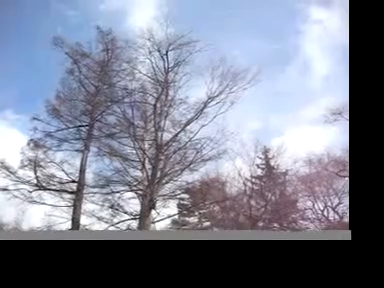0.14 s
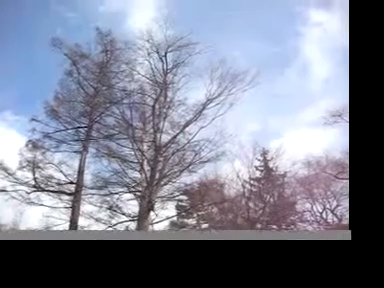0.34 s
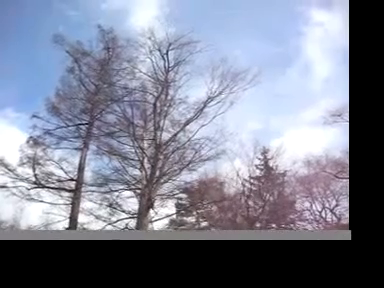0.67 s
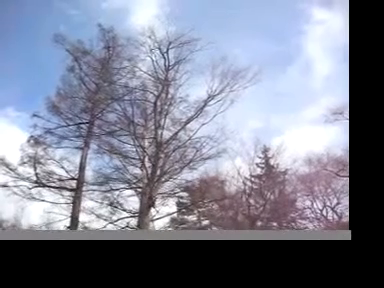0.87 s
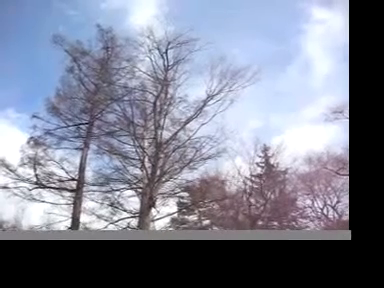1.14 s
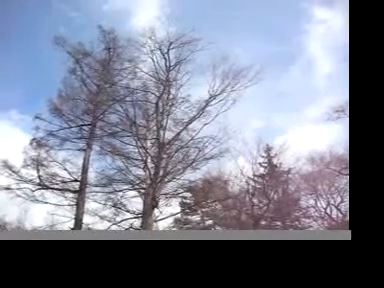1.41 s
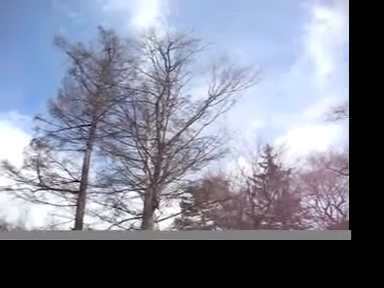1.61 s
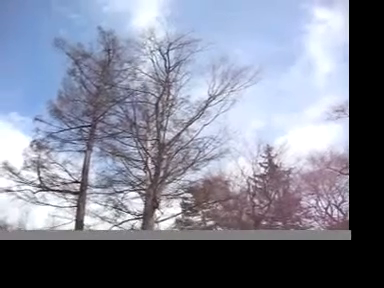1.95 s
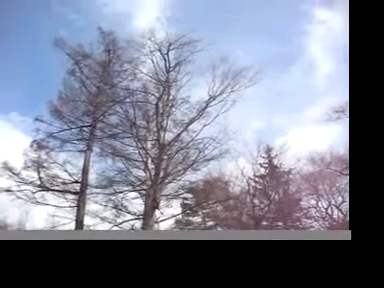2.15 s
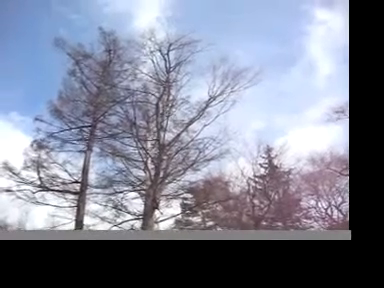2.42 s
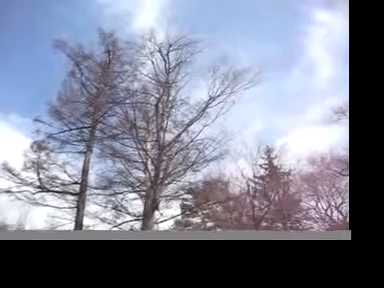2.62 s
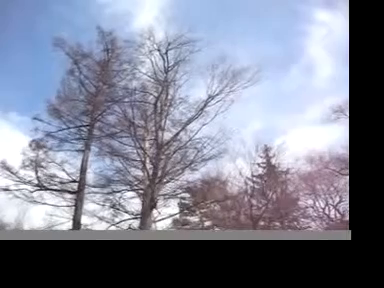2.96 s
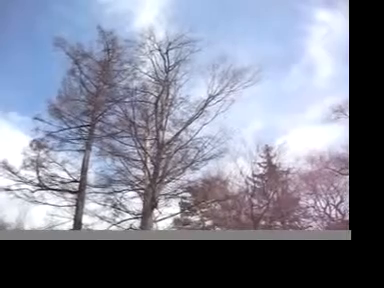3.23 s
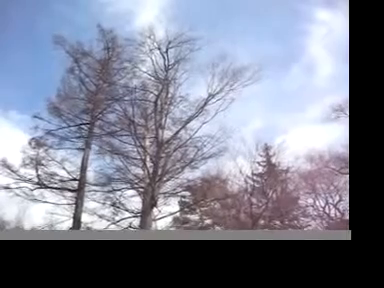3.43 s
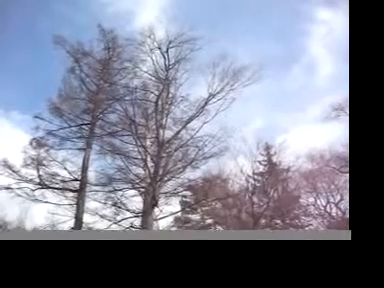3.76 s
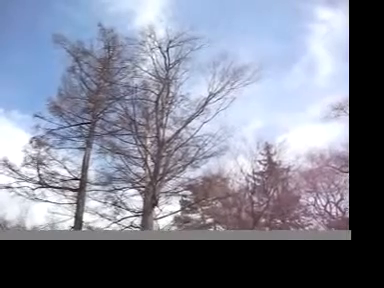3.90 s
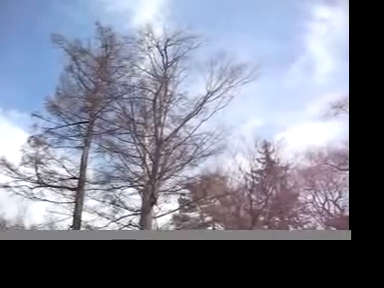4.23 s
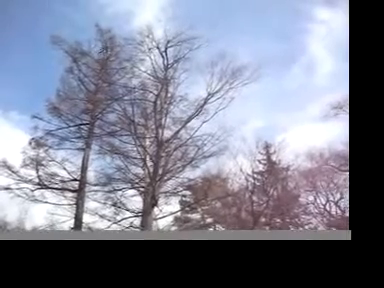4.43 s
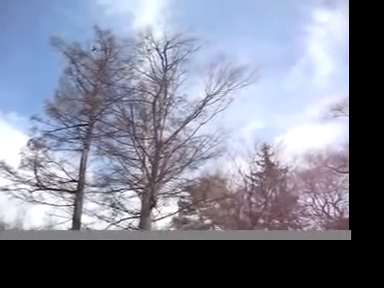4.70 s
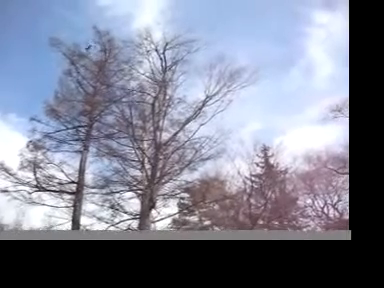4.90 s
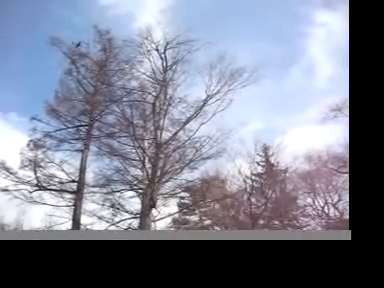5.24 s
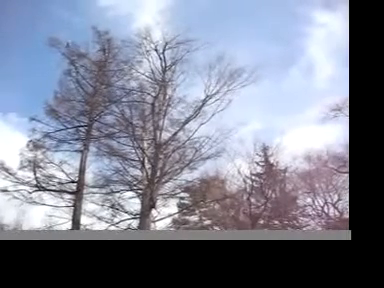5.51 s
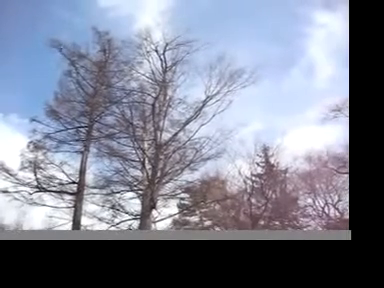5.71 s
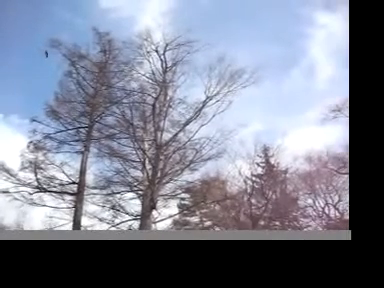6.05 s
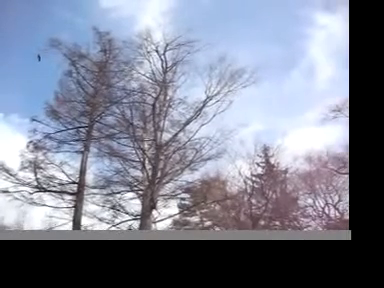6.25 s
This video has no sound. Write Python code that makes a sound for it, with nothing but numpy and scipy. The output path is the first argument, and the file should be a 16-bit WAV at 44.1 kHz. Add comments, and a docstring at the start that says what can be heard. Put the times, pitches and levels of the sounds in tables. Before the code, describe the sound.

Thin small-bird chirps over soft distant rumble, then a bird of prey's piercing slurred whistle breaks into a quickening trill amid wind bumps.

```python
"""Kite whistling in a park

A kite whistles from a tall tree: a rising slur, a high note, lower notes, then a long wavering trill,
all sine whistles with overtones and rasp. Small birds add gliding sines and short chips in a haze of high noise.
Behind them lie coloured noise for distant traffic and wind, a low drone, and gusts thumping the microphone.
The small camera samples slowly, whines faintly, and its hiss swells with the treble."""
import sys
import numpy as np
from scipy import signal
from scipy.io import wavfile
from scipy.ndimage import uniform_filter1d

SR = 44100
rng = np.random.default_rng(int(sys.argv[2]) if len(sys.argv) > 2 else 0)


def output_pcm(signal):
    """Save a mono or channel-first signal as 16-bit PCM at the path in sys.argv[1].

    Samples are clipped to [-1, 1] before scaling.
    """
    pcm = np.clip(np.atleast_2d(signal).T, -1, 1) * 32767
    wavfile.write(sys.argv[1], SR, np.round(pcm).astype(np.int16))


N = 280784


def gain_of(db):
    """Turn decibels into an amplitude factor."""
    return 10 ** (np.asarray(db) / 20)


def evened(x):
    """Scale a signal to rms 1."""
    return x / np.sqrt(np.mean(x ** 2) + 1e-20)


def follow(rows):
    """Draw a gain curve at every sample from (time [s], level [dB]) points."""
    s, db = np.transpose(rows)
    return gain_of(np.interp(np.arange(N) / SR, s, db))


def add(mix, s, sound):
    """Lay a sound into the mix from time s, cut off at the end of the mix."""
    part = mix[round(s * SR):][:len(sound)]
    part += sound[:len(part)]


def drift(samples, count):
    """Smooth random wandering of rms 1: white noise averaged twice over the given span of samples."""
    span = max(int(samples), 2)
    once = uniform_filter1d(rng.standard_normal(count), span)
    return evened(uniform_filter1d(once, span))


def noise(points, patchy_db, size):
    """Noise of rms 1 from random short-time spectra: a set colour with drifting louder and softer patches."""
    hz = np.fft.rfftfreq(size, 1 / SR)
    real, imag, patches = rng.standard_normal((4 * N // size + 5, len(hz), 3)).T
    patches = uniform_filter1d(patches, 12, 0)  # smooth across pitch
    patches = evened(uniform_filter1d(patches, 10, 1))  # smooth across time
    f, db = np.transpose(points)
    colour_db = np.interp(np.log(hz + 1), np.log(f), db, -90, -90)
    spectra = (real + 1j * imag) * gain_of(colour_db[:, None] + patchy_db * patches)
    sound = signal.istft(spectra, nperseg=size, noverlap=3 * size // 4)[1]
    return evened(sound[:N])


def park(x, t60, gap_s):
    """Echoes off trunks and ground: after a gap, sparse taps of random sign that die away by 60 dB in t60."""
    at = np.arange(0, SR - 20, 20)
    at = at + rng.integers(0, 20, len(at))
    taps = np.zeros(SR)
    taps[at] = rng.choice([-1., 1.], len(at)) * gain_of(-60 * at / SR / t60)
    taps = np.r_[np.zeros(int(gap_s * SR)), taps / np.linalg.norm(taps)]
    return signal.fftconvolve(x, taps)[:N]


# Colour of traffic and leaves: (frequency [Hz], relative density [dB per Hz])
WASH_COLOUR = [(60, -7.5), (110, -5), (250, -10), (365, -15), (600, -15), (1000, -16.5), (1500, -23.5),
               (2200, -27), (3200, -27), (4600, -29.5), (6000, -27), (8000, -57)]
# Loudness of the wash: (time [s], level [dB])
WASH_LEVEL = [(0.0, -42), (0.87, -39), (2.12, -38.5), (2.71, -37.5), (3.12, -39), (4.5, -39.5), (5.0, -39),
              (6.36, -39)]


def wash():
    """Distant traffic and wind in the branches: broad coloured noise on a slow level curve."""
    return follow(WASH_LEVEL) * noise(WASH_COLOUR, patchy_db=0.54, size=1024)


# Low drone, maybe a far engine, before its wavering:
# (time [s], pitch [Hz], fundamental level [dB], octave level [dB])
DRONE_COURSE = [(0, 68.4, -57, -51.5), (2.0, 67.1, -50, -52), (2.9, 66.2, -46, -44), (3.2, 66.95, -47, -59),
                (3.8, 68.3, -48, -55), (4.05, 68.2, -38.5, -50), (4.5, 70.5, -49, -58),
                (5.5, 69.64, -45.5, -59), (6.36, 71, -49, -53)]


def drone():
    """A low tone and its octave, locked in phase, wavering in pitch and each in level."""
    s, *columns = np.transpose(DRONE_COURSE)
    hz, low_db, octave_db = (np.interp(np.arange(N) / SR, s, c) for c in columns)
    phase = 2 * np.pi * np.cumsum(hz + 1.477 * drift(2760, N)) / SR
    low = gain_of(low_db + 1.6 * drift(3000, N)) * np.sin(phase)
    octave = gain_of(octave_db + 2.5 * drift(3000, N)) * np.sin(2 * phase)
    return np.sqrt(2) * (low + octave)


# Whining tones: (frequency from frame to frame [Hz], lowering within a frame [Hz], relative level [dB])
WHINE_TONES = [(2774, 9.5, 0), (3176, 15, -13)]
# Loudness of the whine between its dips: (time [s], level [dB])
WHINE_LEVEL = [(0, -55), (.6, -53), (1.2, -51.5), (4, -51), (6.36, -50.5)]
FRAMES_PER_S = 30


def whine():
    """Thin tones from the camera's electronics that dip and jump in phase with every picture frame."""
    t = np.arange(N) / SR
    frame_s = 1 / FRAMES_PER_S
    since = (t + .0064) % frame_s
    from_edge = np.minimum(since, frame_s - since)
    dips = 1 - .7 * np.exp(-(from_edge / .001) ** 2)
    tones = np.zeros(N)
    for hz, lower_hz, db in WHINE_TONES:
        tones += gain_of(db) * np.sin(2 * np.pi * (hz * t - lower_hz * since))
    return np.sqrt(2) * follow(WHINE_LEVEL) * dips * tones


# Colour of the wind rumble: (frequency [Hz], relative density [dB per Hz])
RUMBLE_COLOUR = [(15, -28), (40, 1.5), (68, 4), (100, -2), (140, -10.5), (200, -17.5), (300, -26.5),
                 (450, -33)]
# Loudness of the rumble at the microphone: (time [s], level [dB])
WIND_LEVEL = [(0.0, -46), (0.32, -39.5), (0.46, -30.5), (0.87, -38), (1.65, -34.5), (2.02, -44.5),
              (2.34, -42.5), (2.92, -32), (3.19, -37.5), (3.43, -29.5), (3.58, -31.5), (3.67, -48),
              (3.95, -40), (4.94, -41), (5.9, -45), (6.36, -40)]


def rumble():
    """Lumpy low noise of eddies at the microphone."""
    lumps = gain_of(2.6 * drift(500, N))
    return follow(WIND_LEVEL) * evened(lumps * noise(RUMBLE_COLOUR, patchy_db=1.0, size=2048))


# Gust thumps: (centre time [s], peak level of the fundamental [dB], frequency [Hz])
THUMPS = [(0.343, -22.5, 89), (0.389, -19, 97), (0.41, -24, 69.5), (0.529, -20, 174), (0.539, -12, 103),
          (0.57, -20, 102), (0.817, -24, 92), (1.156, -25.5, 82), (1.238, -23.5, 89.5), (1.291, -16.5, 78),
          (1.311, -23, 111), (2.82, -19.5, 92), (2.863, -22, 161), (2.927, -19, 73.9), (3.042, -20.5, 83),
          (3.136, -24.5, 97), (3.28, -16.5, 124.8), (3.302, -22, 110.3), (3.325, -15.5, 117.4),
          (3.336, -19, 214), (3.358, -24, 69), (3.387, -15.5, 106), (3.397, -18, 174), (3.424, -22.5, 68.4),
          (3.492, -16, 80.5), (3.517, -18.5, 97), (3.582, -18.5, 103), (4.289, -24, 74.4)]
# Half width of a 100 Hz thump [s]; higher ones are shorter by this power of pitch
THUMP_HALF_S, THUMP_SHORTER = .0062, 0.53


def thumps():
    """Single gusts at the microphone: a brief low swing with a weaker octave under a bell-shaped envelope."""
    out = np.zeros(N)
    for s, db, hz in THUMPS:
        half_s = THUMP_HALF_S / (hz / 100) ** THUMP_SHORTER
        t = np.arange(-4 * half_s, 4 * half_s, 1 / SR)
        swing = 2 * np.pi * (hz * t + rng.random())
        shape = np.cos(swing) + 0.24 * np.cos(2 * swing + 1)  # a pointed, lopsided pressure swing
        add(out, s + t[0], gain_of(db) * shape * np.exp(-(t / half_s) ** 2))
    return out


# Colour of the echo haze around the chirps: (frequency [Hz], relative density [dB per Hz])
HAZE_COLOUR = [(3600, -17), (4200, -2.5), (4800, -2), (5300, -4), (6200, -12)]
# Swells of the haze: (centre time [s], half width [s], level at the centre [dB])
HAZE_SWELLS = [(.8, 0.18, -51), (1.42, 0.2, -50), (4.62, .12, -55), (4.9, 0.12, -50.5), (5.6, 0.18, -61)]


def haze():
    """Echo haze around the chirps: patchy high noise that swells and fades."""
    t = np.arange(N) / SR
    level = np.zeros(N)
    for s, width_s, db in HAZE_SWELLS:
        level += gain_of(db) * np.exp(-((t - s) / width_s) ** 2)
    return level * noise(HAZE_COLOUR, patchy_db=2.0, size=512)


# Short dry chips of a small bird: (centre time [s], frequency at the centre [Hz], peak level [dB])
CHIPS = [(3.64, 4000, -42), (3.669, 5200, -40), (3.679, 3950, -41), (3.715, 4000, -50), (3.755, 3900, -51),
         (.715, 4780, -49), (1.424, 4850, -48)]


def chips():
    """Each chip is a few milliseconds of falling tone."""
    out = np.zeros(N)
    t = np.arange(-.012, .012, 1 / SR)
    for s, hz, db in CHIPS:
        chip = np.sin(2 * np.pi * hz * t * (1 - 4 * t)) * np.exp(-(t / .003) ** 2)
        add(out, s + t[0], gain_of(db) * chip)
    return out


# Small birds, dry and before their flutter: (start time [s], glide [s], hold [s], from [Hz], to [Hz],
# bend [power; over 1 moves slowly near the higher pitch], loudest level [dB], place of the loudest [0-1])
CHIRP_CALLS = [(.05, .08, 0, 2700, 2630, 1.1, -55, .6), (.30, .06, 0, 2620, 2890, 1.5, -57, .3),
               (.45, .05, 0, 2880, 2700, 1.3, -57, .4), (.70, .03, 0, 5000, 4700, 1.1, -52, .5),
               (.722, .078, 0, 5150, 3050, 1.3, -47, .3), (.95, .03, 0, 4500, 3750, 1.1, -55, .5),
               (.97, .035, 0, 3800, 4350, 1.1, -53, .5), (1.19, .085, .1, 3100, 4880, 1.9, -48, .38),
               (1.40, .03, 0, 5230, 4850, 1.1, -51, .5), (1.43, .075, 0, 5190, 3200, 1.4, -44, .3),
               (1.66, .035, 0, 4500, 3600, 1.1, -53, .5), (1.848, .07, .05, 3900, 5000, 1.9, -47, .2),
               (2.185, .065, 0, 5250, 4300, 1.3, -48, .6), (2.31, .06, .035, 4300, 4880, 1.6, -46, .7),
               (3.785, .075, .09, 3400, 4300, 1.05, -49.5, .4), (4.095, .033, 0, 4250, 3300, 1.3, -51, .3),
               (4.20, .07, 0, 3100, 4480, 1.05, -43, .6), (4.54, .06, 0, 3120, 4420, .9, -43, .35),
               (4.81, .085, .03, 2700, 5100, 2.2, -54, .5), (4.97, .035, 0, 4950, 5050, 1.1, -49, .5),
               (5.34, .085, 0, 3000, 4440, 1.05, -47, .5), (5.54, .065, 0, 5200, 4000, 1.3, -48, .45),
               (5.95, .07, .06, 3500, 2930, .7, -52, .5), (6.345, .022, 0, 5070, 5040, 1.1, -50, .5)]
CHIRP_FADE_DB = 11  # from the loudest place to the further end


def small_birds():
    """Thin gliding sine whistles with a level flutter, further away and so wetter."""
    out = np.zeros(N)
    for start, glide_s, hold_s, from_hz, to_hz, bend, peak_db, peak in CHIRP_CALLS:
        t = np.arange(0, glide_s + hold_s, 1 / SR)
        gone = np.minimum(t / glide_s, 1)
        below_top = (gone if from_hz > to_hz else 1 - gone) ** bend
        hz = max(from_hz, to_hz) - abs(from_hz - to_hz) * below_top
        hz = hz + 30 * drift(120, len(t))
        from_peak = (t / t[-1] - peak) / max(peak, 1 - peak)
        soft_ends = signal.windows.tukey(len(t), min(500 / len(t), 1))
        level = gain_of(peak_db - CHIRP_FADE_DB * from_peak ** 2) * soft_ends
        add(out, start, np.sqrt(2) * level * np.sin(2 * np.pi * np.cumsum(hz) / SR))
    out = out * gain_of(3 * drift(150, N))
    twigs = gain_of(-9) * park(out, t60=.2, gap_s=.006)
    return out + twigs + gain_of(-2) * park(out, t60=.7, gap_s=.02)


# Notes before the trill, joined by sudden breaks:
# (start time [s], from [Hz], to [Hz], bend [power; under 1 glides early, over 1 late])
KITE_NOTES = [(1.69, 2123, 2536, 0.75), (1.7435, 2896, 2730, 1.53), (1.884, 2256, 2181, .4),
              (1.976, 2130, 2164, 0.91), (2.15, 2085, 2027, 1.31)]
# Top of each warble in the trill: time [s]
TRILL_CRESTS = [2.299, 2.383, 2.466, 2.555, 2.644, 2.735, 2.822, 2.908, 2.997, 3.076, 3.142, 3.22, 3.285,
                3.349, 3.415, 3.476, 3.535, 3.568]
# The two pitches the trill swings between: (time [s], crest [Hz], dip [Hz])
TRILL_SWING = [(2.257, 2142, 2040), (2.51, 2180, 1986), (2.72, 2261, 2002), (2.951, 2305, 2045),
               (3.1, 2340, 2125), (3.25, 2365, 2200), (3.38, 2378, 2260), (3.51, 2373, 2337),
               (3.55, 2322, 2200)]
TRILL_S, BREAK_S = 2.257, .003  # the trill starts from a dip; each break takes this long [s]
LINGER = 1.12  # power; over 1 the trill stays longer at its crests than in its dips
DULL_DB_PER_KHZ, DULL_LEAD = 38, 0.07  # overtone loss per kHz of swing at crests; lead [warbles]


def kite_pitch(t):
    """Bent glides, then a swing from crest to dip; returns pitch [Hz] and the overtone's loss at crests [dB]."""
    start, from_hz, to_hz, bend = np.transpose(KITE_NOTES)
    count = len(start)
    place = np.interp(t, np.r_[start, TRILL_S], np.arange(count + 1))
    place = np.clip(place, 0, count - 1e-9)
    note = place.astype(int)
    glides = from_hz[note] + (to_hz - from_hz)[note] * (place % 1) ** bend[note]
    # whole numbers of warbles are crests, halves are dips
    warble = np.interp(t, np.r_[TRILL_S, TRILL_CRESTS], np.r_[-.5, np.arange(len(TRILL_CRESTS))])
    swing_s, *turns = np.transpose(TRILL_SWING)
    crest_hz, dip_hz = (np.interp(t, swing_s, c) for c in turns)
    width_hz = crest_hz - dip_hz
    trill = crest_hz - width_hz * (np.sin(np.pi * warble) ** 2) ** LINGER
    hz = uniform_filter1d(np.where(t < TRILL_S, glides, trill), int(BREAK_S * SR), mode="nearest")
    at_crest = np.cos(np.pi * (warble + DULL_LEAD)) ** 2 * (t > TRILL_S)
    return hz, at_crest * DULL_DB_PER_KHZ * width_hz / 1000


# Blowing effort before throat gain, and overtone before its loss at crests:
# (time [s], effort level [dB], octave overtone level [dB])
KITE_EFFORT = [(1.69, -48, -56), (1.705, -44, -42), (1.719, -40, -42), (1.735, -47, -46),
               (1.745, -37.5, -46), (1.815, -39.5, -46), (1.875, -43.5, -58), (1.9, -39, -45),
               (1.97, -40, -45), (2.02, -42.5, -47), (2.08, -40.5, -43.5), (2.135, -41, -44.5),
               (2.149, -44, -56), (2.165, -40, -42.5), (2.27, -44.5, -40.5), (2.5, -43.5, -41.5),
               (2.9, -42.5, -40), (3.1, -40.5, -35), (3.3, -40, -35.5), (3.4, -39, -41.5),
               (3.48, -40.5, -43.5), (3.555, -41.5, -45), (3.576, -68, -75)]
# How the throat favours the whistle by pitch: (frequency [Hz], gain [dB])
THROAT_GAIN = [(1985, 3.5), (2060, -1), (2150, -2.5), (2220, 2), (2290, 3), (2350, 9), (2400, 7), (2520, 7),
               (2900, 7.5)]
# Colour of the breath in the call: (frequency [Hz], relative density [dB per Hz])
RASP_COLOUR = [(2000, -9), (2500, 4.5), (3200, 3.5), (4000, -10), (5000, -11), (6000, 4)]
CRACK_S, CRACK_WIDTH_S, CRACK_DB = 2.715, .04, 11  # the voice cracks briefly into uneven cycles


def kite():
    """A whistle and its octave on one pitch, with frayed overtone, uneven cycles, rasp and echoes."""
    s, effort_db, octave_db = np.transpose(KITE_EFFORT)
    t = np.arange(s[0], s[-1], 1 / SR)
    count = len(t)
    hz, dull_db = kite_pitch(t)
    effort_db = np.interp(t, s, effort_db)
    whistle_db = effort_db + np.interp(hz, *np.transpose(THROAT_GAIN))
    over_db = np.interp(t, s, octave_db) - dull_db
    phase = 2 * np.pi * np.cumsum(hz + 10.6 * drift(99, count)) / SR
    whistle = gain_of(whistle_db + 0.89 * drift(310, count)) * np.sin(phase)
    overtone = gain_of(over_db + 1.6 * drift(250, count)) * np.sin(2 * phase)
    below_high_note = hz < 2600
    # hard blowing frays the overtone
    flutter = drift(40, count) * np.sin(2 * phase) + drift(40, count) * np.cos(2 * phase)
    blur = gain_of(whistle_db - 17.0) * flutter * below_high_note
    # uneven pairs of cycles: a partial between whistle and octave
    crack_db = CRACK_DB * np.exp(-((t - CRACK_S) / CRACK_WIDTH_S) ** 2)
    between = gain_of(effort_db - 16.5 + crack_db + 4.5 * drift(500, count))
    between = between * np.sin(1.5 * phase) * below_high_note
    tone_level = np.hypot(gain_of(whistle_db), gain_of(over_db))
    rasp = gain_of(-13) * tone_level * noise(RASP_COLOUR, patchy_db=2.6, size=512)[:count]
    out = np.zeros(N)
    add(out, t[0], np.sqrt(2) * (whistle + overtone + between) + blur + rasp)
    boughs = gain_of(-11) * park(out, t60=.12, gap_s=.004)  # the near branches smear the swings
    return out + boughs + gain_of(-14.5) * park(out, t60=1.3, gap_s=.02)


def scene():
    """Mix background, wind and birds into one channel."""
    background = wash() + drone() + whine()
    wind = rumble() + thumps()
    birds = haze() + chips() + small_birds() + kite()
    return (background + wind + birds)[None]


SLOWER = 4  # the camera keeps one sample in four
TAPS = 73  # length of the soft filter that fills the gaps again
EDGE_HZ = 15690  # upper band limit


def hiss(x, span, db):
    """White noise that grows with the steepness of the wave, averaged over a span of samples."""
    steep = np.sqrt(abs(uniform_filter1d(np.diff(x, prepend=0) ** 2, span)))
    return gain_of(db) * steep * rng.standard_normal(len(x))


def record(dry):
    """Slow sampling folds high partials down; hiss comes before and after the gaps are filled;
    then the band limit and a small constant offset."""
    kept = dry[0, ::SLOWER]
    kept = kept + hiss(kept, span=24, db=-22.0)
    smoothing = signal.firwin(numtaps=TAPS, cutoff=5200., window=("kaiser", 5.5), fs=SR)
    full = SLOWER * signal.upfirdn(smoothing, kept, SLOWER)[TAPS // 2:][:N]
    full = np.pad(full, (0, N - len(full)))
    full = full + hiss(full, span=120, db=-20.5)
    edge = signal.firwin(1023, EDGE_HZ, window=("kaiser", 11), fs=SR)
    offset = -.0077
    return signal.oaconvolve(full, edge, "same")[None] + offset


dry = scene()
out = record(dry)
output_pcm(out)
```